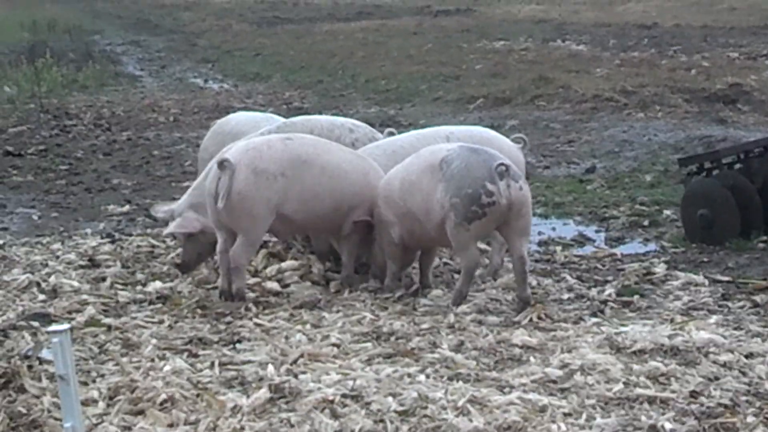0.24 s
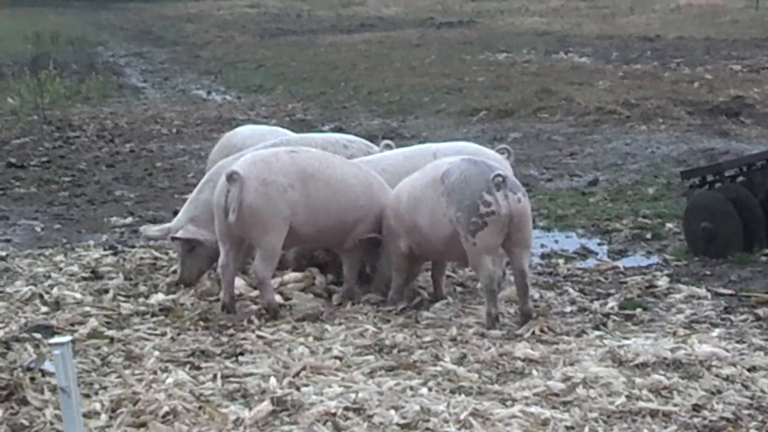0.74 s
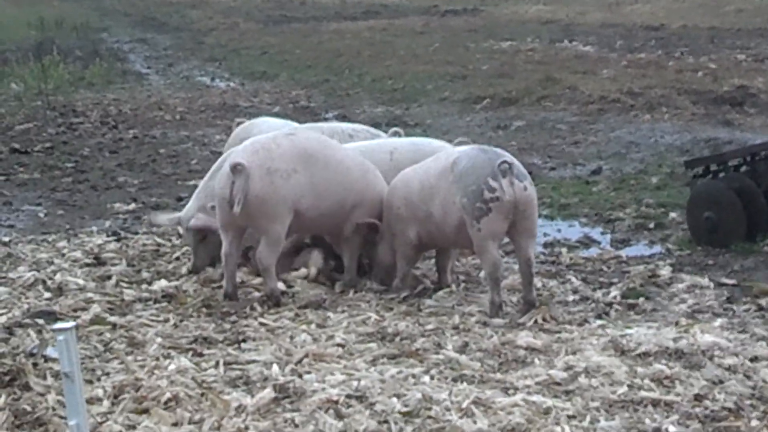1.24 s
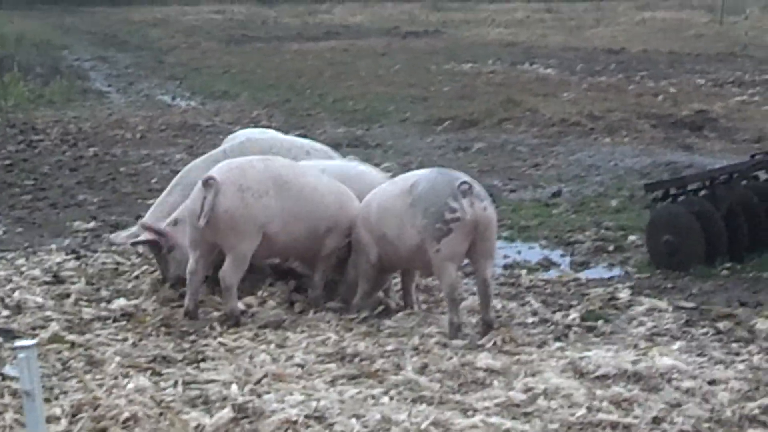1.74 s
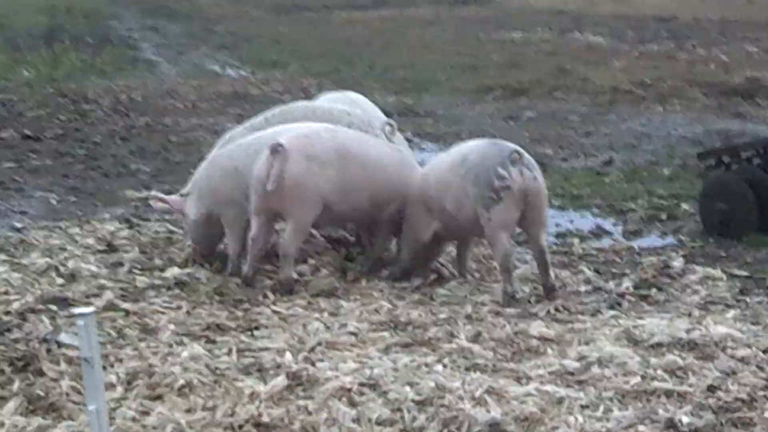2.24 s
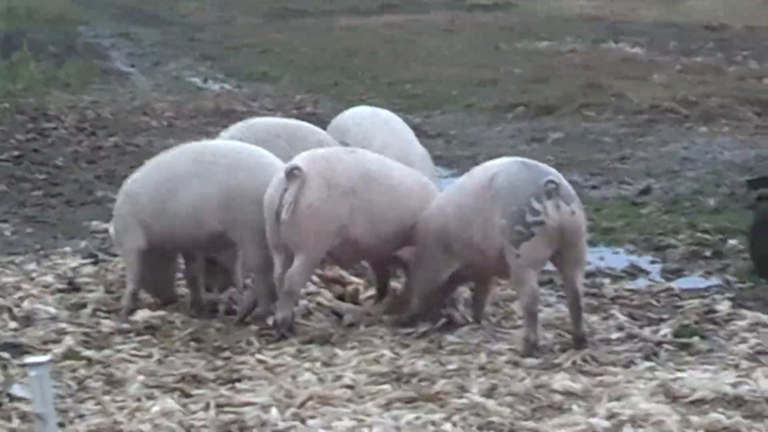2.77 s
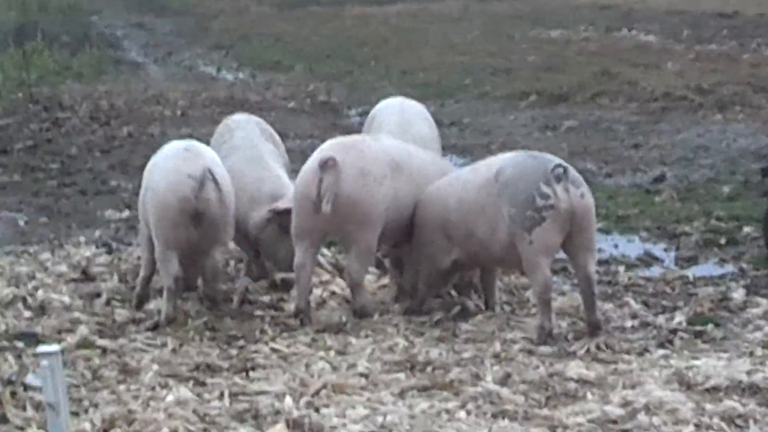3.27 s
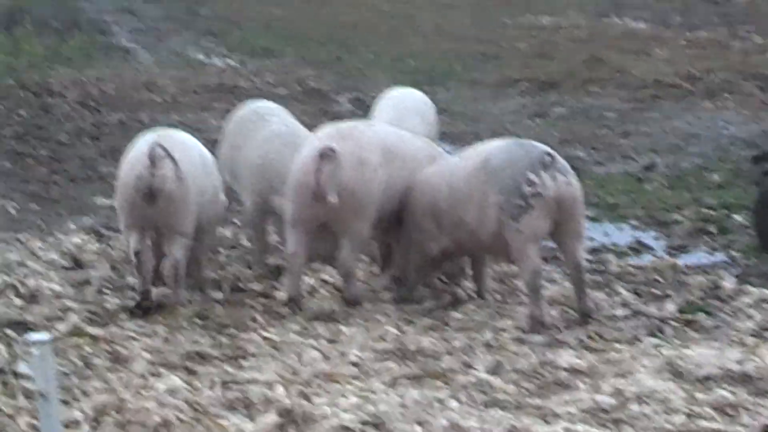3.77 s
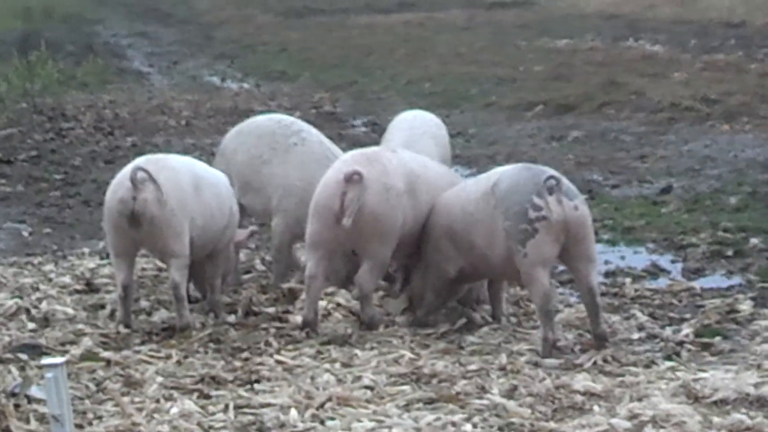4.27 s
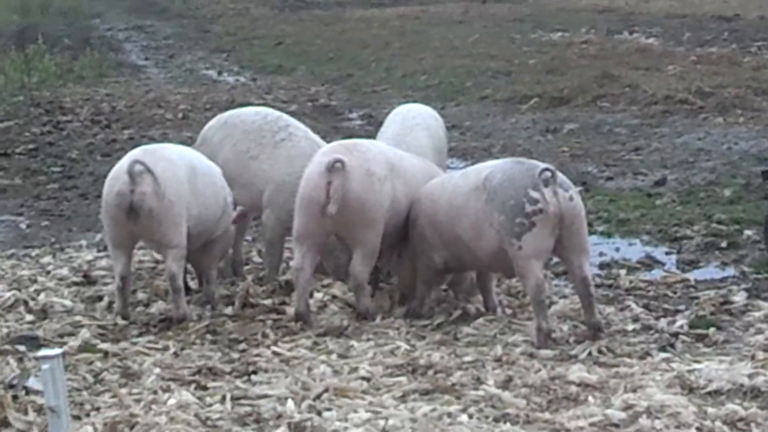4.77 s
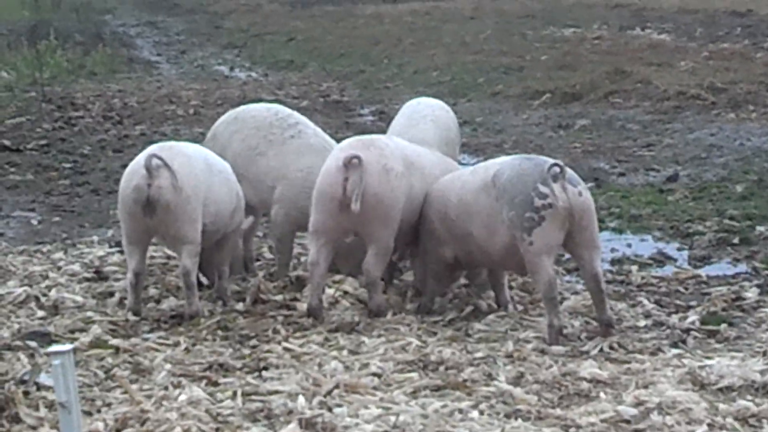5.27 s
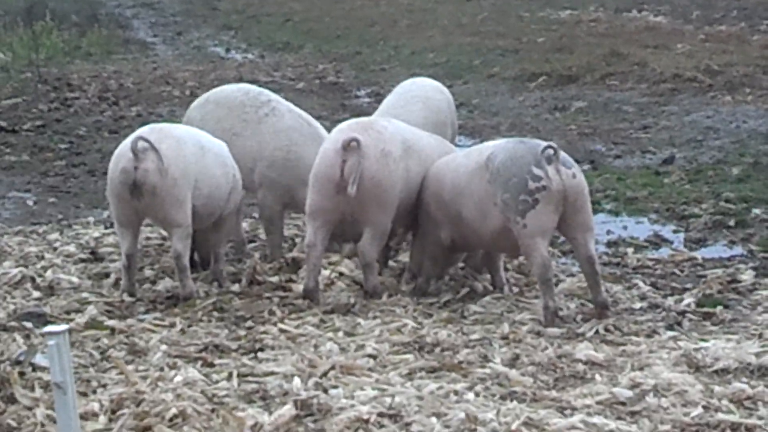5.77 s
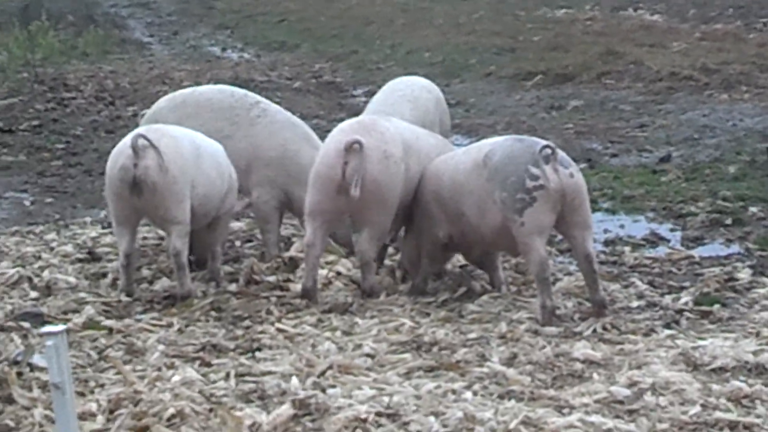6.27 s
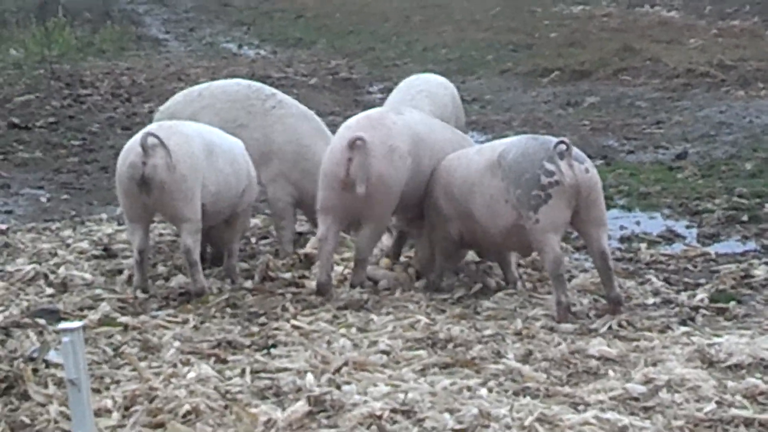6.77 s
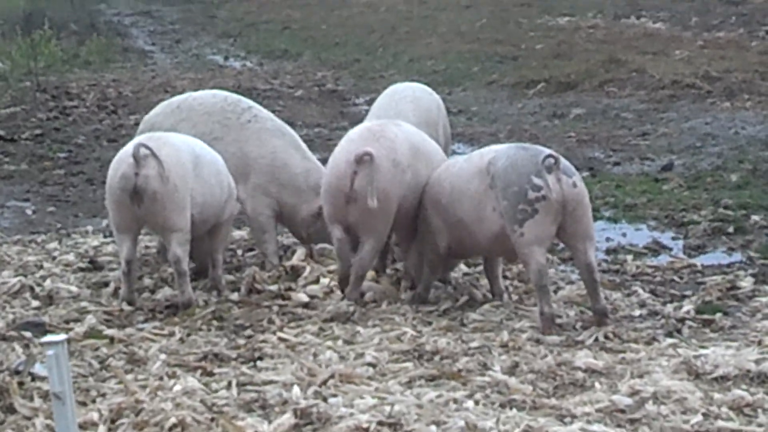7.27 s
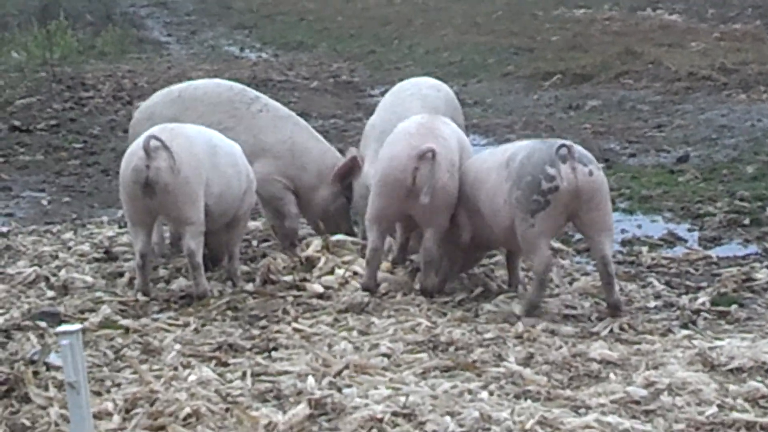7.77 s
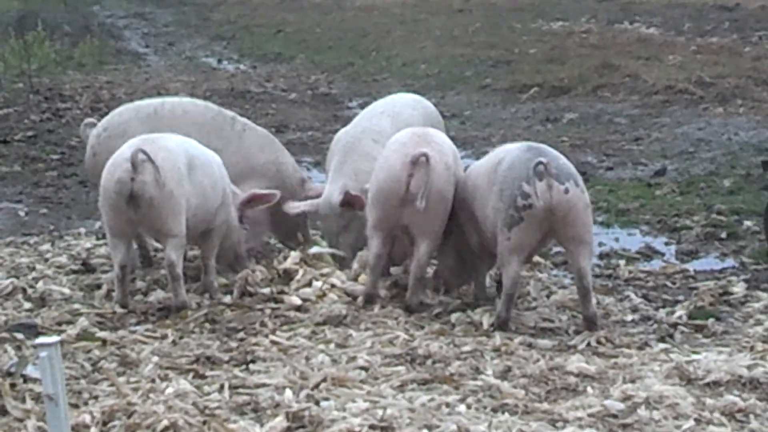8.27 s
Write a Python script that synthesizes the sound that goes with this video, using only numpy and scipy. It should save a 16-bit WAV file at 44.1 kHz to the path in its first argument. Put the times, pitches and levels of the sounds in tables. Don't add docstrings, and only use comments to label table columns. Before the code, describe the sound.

Close handheld pickup in an open field: pigs rooting in dry corn stalks. From 0 s, crackly rustling and small brittle snaps over a low distant rumble and soft hiss. At about 1.05 s a loud, hard, hollow clack and boom; the background dips, then climbs. Another sharp knock at 1.5 s, rustling until 2.2 s, with millisecond ticks on the microphone around 2.2 s and a deep duck into near quiet. Dull hollow bumps cluster at 3.1 s as the rumble slowly swells; faint bird whistles near 3.9 s. A strong boom lands at 4.6 s. From 5.3 to 6.2 s rustling is brightest, with crisp snaps and the clearest bird whistle at 5.55 s. Heavy thud at 6.1 s, then tumbling thuds and knocks from 6.8 to 7.5 s, softer bumps to 8.1 s, faint whistles and final rustles over the loud rumble, ending about 8.5 s.

```python
import sys
import numpy as np
from scipy import signal
from scipy.io import wavfile
from scipy.ndimage import uniform_filter1d

SR = 44100
rng = np.random.default_rng(int(sys.argv[2]) if len(sys.argv) > 2 else 0)


def wav_record(signal):
    frames = np.transpose(np.atleast_2d(signal))
    bounded = np.clip(frames, -1, 1)
    quanta = np.round(bounded * 32767).astype(np.int16)
    wavfile.write(sys.argv[1], SR, quanta)


def makeup_ratio(level_db):
    decades = np.asarray(level_db, float) / 20
    return 10 ** decades


N = 375732
GAIN_EDGE_S = 0.024


def rms_one(x):
    return x / np.sqrt(np.mean(x ** 2) + 1e-20)


def peak_one(x):
    return x / np.abs(x).max()


def add(track, s, sound):
    i = round(s * SR)
    track[i:i + len(sound)] += sound[:N - i]


def at_hz(points, hz):
    point_hz, level = np.transpose(points)
    return np.interp(np.log(hz), np.log(point_hz), level)


def drift(rate_hz):
    r = np.exp(-2 * np.pi * rate_hz * 40 / SR)
    noise = rng.standard_normal(N // 40 + 2002)
    slow = signal.lfilter([1], [1, -2 * r, r * r], noise)[2000:]
    return np.interp(np.arange(N) / 40, np.arange(len(slow)), rms_one(slow))


def ring(clicks, hz, t60):
    r = makeup_ratio(-60 / (t60 * SR))
    w = 2 * np.pi * hz / SR
    return signal.lfilter([0, np.sin(w)], [1, -2 * r * np.cos(w), r * r], clicks + 1e-18)


def coloured(sources, spectrum, shared_db, patchy_db):
    out = 0
    together = drift(9.0)
    edges = 25 * 2 ** np.arange(0, 9.5, 1 / 3)
    for k, (low, high) in enumerate(zip(edges, edges[1:])):
        bandpass = signal.butter(2, [low, high], "band", fs=SR, output="sos")
        band = signal.sosfilt(bandpass, sources[k % 2])
        level_db = at_hz(spectrum, np.sqrt(low * high))
        flicker_db = shared_db * together + patchy_db * drift(3.4)
        out = out + band * makeup_ratio(level_db + flicker_db)
    return rms_one(out)


def gain_control():
    # (time [s], far rumble level left [dB])
    resets = [(0.0, -40), (1.068, -48), (1.53, -45.5), (1.87, -45), (2.222, -55.5), (3.2, -47), (4.66, -43),
              (6.133, -40), (6.9, -37), (7.22, -40), (7.5, -40)]
    recover_db_per_s = 9
    t = np.arange(N) / SR
    s, db = np.transpose(resets)
    last = np.clip(np.searchsorted(s, t, "right") - 1, 0, None)
    level = db[last] + recover_db_per_s * (t - s[last])
    return uniform_filter1d(level, size=int(GAIN_EDGE_S * SR), mode="nearest")


def far_rumble():
    # (frequency [Hz], density [dB per Hz])
    rumble_spectrum = [(30, -23), (50, -8), (80, -1.5), (130, 3), (200, -3.5), (340, -7.5), (600, -17),
                       (1000, -15), (1700, -25), (3000, -31), (5200, -85), (8000, -65), (16000, -82)]
    return coloured(rng.standard_normal((2, N)), rumble_spectrum, shared_db=.25, patchy_db=.7)


def air_hiss():
    # (frequency [Hz], density [dB per Hz])
    hiss_spectrum = [(3000, 3.5), (6000, 6.5), (9000, 2.5), (12000, 1), (14500, 8.5), (15600, 1.5),
                     (20000, 1.5)]
    return coloured(rng.standard_normal((2, N)), hiss_spectrum, shared_db=0.9, patchy_db=.7)


def bird():
    # (time [s], length [s], top pitch [Hz], level [dB], top reached after [s])
    whistles = [(1.56, .19, 3280, -61, -.05), (2.0, 0.24, 3360, -57.5, .01), (2.556, .23, 3450, -65, -.08),
                (3.19, 0.25, 3350, -57, -0.021), (3.888, 0.11, 3360, -53, -.05),
                (3.98, .13, 3200, -61, 0.039), (5.545, 0.32, 3360, -42.5, .08),
                (6.417, 0.24, 3280, -50.5, 0.019), (7.74, .2, 3670, -59, -0.0028),
                (7.82, 0.1, 3600, -55, -.15), (8.05, 0.2, 3650, -55, -.03), (8.14, .14, 3530, -50, -0.085),
                (8.35, 0.062, 3820, -53, 0.0033), (8.41, .105, 2850, -52, -.03)]
    sag_hz_per_s, curl_hz_per_s2, fade_db_per_s = 330, 2020, 22
    out, waver, wobble = np.zeros(N), drift(30.0), drift(30.0)
    for s, length, hz, db, top_s in whistles:
        t = np.arange(0, length, 1 / SR)
        off = np.sqrt((t - top_s) ** 2 + .02 ** 2)
        glide = hz - sag_hz_per_s * off - curl_hz_per_s2 * off ** 2
        glide = glide + 20 * wobble[int(s * SR):][:len(t)]
        shape = makeup_ratio(db + 11.0 - fade_db_per_s * off) * signal.windows.tukey(len(t), .35)
        add(out, s, shape * np.sin(2 * np.pi * np.cumsum(glide) / SR))
    return out * makeup_ratio(3.8 * waver - 5.5)


def ticks():
    # (time [s], low ring [Hz], low ring level [dB], high ring level [dB], click level [dB])
    housing_ticks = [
        (2.1589, 3800, -16, -19.5, -35),
        (2.2186, 4830, -10, -9.5, -33),
        (2.2524, 2500, -20, -11, -29),
    ]
    high_hz = 12450
    out, click = np.zeros(N), np.zeros(SR // 50)
    click[:2] = 1, -.6
    for s, low_hz, low_db, high_db, click_db in housing_ticks:
        low = peak_one(ring(ring(click, low_hz, 0.00071), low_hz, 0.00064))
        high = peak_one(ring(ring(click, high_hz, 0.00066), high_hz, 0.00065))
        add(out, s, makeup_ratio(low_db) * low + makeup_ratio(high_db) * high + makeup_ratio(click_db) * click)
    return out


def shoving():
    # (time [s], lift of the rumble [dB], lift of the hiss [dB], fade [s])
    shoves = [(1.051, 22, 5, 0.12), (1.53, 7, 12, 0.024), (2.19, 10.5, 7, 0.052), (3.05, -2, 11, .14),
              (4.58, 5, 4.5, 0.13), (5.6, 2.5, 8.5, 0.3), (.76, 1.4, -2, 0.19), (6.42, -1.7, 5, .3),
              (5.86, 2.5, 2, 0.38), (6.8, 0.5, 1, 0.099), (7.08, 6.5, 4, 0.17), (7.95, 0, 8.5, 0.14)]
    t = np.arange(N) / SR
    lift = np.zeros((2, N))
    for s, *lifts_db, fade_s in shoves:
        lift += np.outer(lifts_db, (t >= s) * np.exp(-np.abs(t - s) / fade_s))
    return uniform_filter1d(lift, size=int(GAIN_EDGE_S * SR))


def all_knocks():
    # (time [s], thump [dB], thump pitch [Hz], clack [dB], t60 [s])
    thuds = [(0.582, -26, 148, -39, 0.11), (1.0445, -6, 480, -1.5, .035), (1.063, -25, 170, -21.5, 0.13),
             (1.109, -16, 202, -30, 0.054), (1.844, -40.5, 221, -36.5, 0.38), (4.165, -25, 168, -34, 0.071),
             (4.429, -36, 191, -37, 0.23), (4.577, -21, 150, -34.5, 0.22), (6.086, -16.5, 120, -38, 0.035),
             (6.106, -23, 238, -45, 0.039), (6.124, -6.5, 242, -42, 0.093), (6.832, -7, 138, -21.5, 0.058),
             (6.86, -15, 184, -46, 0.06), (6.887, -9.5, 121, -25, 0.082), (7.072, -14.5, 200, -35, .051),
             (7.115, -16.5, 168, -27, 0.091), (7.136, -29, 122, -26, 0.24), (7.459, -10, 218, -33, 0.075),
             (7.807, -17.5, 125, -43, .1), (7.897, -24.5, 122, -48, 0.22), (8.116, -23, 150, -36, 0.12)]
    # (time [s], thump [dB], clack [dB], t60 [s])
    booms = [(0.262, -22, -47, 0.069), (1.0498, -8.5, -10.5, 0.031), (1.074, -18, -22.5, 0.2),
             (1.553, -24, -33.5, 0.13), (3.068, -16, -35.5, .15), (3.082, -25, -34, 0.18),
             (3.104, -27, -41, 0.15), (3.122, -19, -26.5, 0.16), (3.145, -27, -42, 0.32),
             (3.229, -32, -52, 0.4), (4.618, -8, -16.5, 0.12), (4.668, -21, -53, 0.25),
             (6.877, -24, -25.5, 0.046), (7.041, -18.5, -34, 0.076), (7.15, -21, -29.5, .14),
             (7.164, -9, -33, 0.18), (7.186, -9.5, -18.5, 0.075), (7.192, -16, -20.5, 0.03),
             (1.519, -16.5, -35, 0.11), (7.46, -16, -39, 0.085), (7.469, -19.5, -44, 0.071)]
    # (time [s], thump [dB], thump pitch [Hz], clack [dB], crack pitch [Hz])
    raps = [(0.533, -48, 300, -41, 1060), (1.147, -45, 443, -25.5, 2720), (1.5173, -9, 620, -13.5, 940),
            (1.71, -30, 416, -32, 2300), (2.618, -47, 254, -42.5, 2180), (3.185, -29, 450, -24.5, 1050),
            (4.649, -16, 410, -23.5, 2560), (5.465, -29, 350, -28, 2140), (7.034, -21, 484, -26, 2500),
            (7.172, -19, 510, -31, 2400), (7.19, -19.5, 506, -33, 2400)]
    cavity_hz, thud_crack_hz, boom_crack_hz, rap_t60_s = 307, 1460, 1530, 0.066
    blows = [(s, thump, hz, clack, thud_crack_hz, t60) for s, thump, hz, clack, t60 in thuds]
    blows += [(s, thump, cavity_hz, clack, boom_crack_hz, t60) for s, thump, clack, t60 in booms]
    return blows + [(*row, rap_t60_s) for row in raps]


def knocks(grit_per_s, body_db, crunch_db):
    # (frequency [Hz], level [dB], t60 [s])
    modes = [
        (303, -27, 0.36),
        (468, -5, 0.17),
        (526, -14, 0.077),
        (782, 2, 0.061),
        (1095, -2, 0.064),
        (1360, -5, 0.0076),
        (1695, -9.5, 0.051),
        (1800, -46, 0.0044),
        (2300, -2, 0.035),
        (2500, 0, 0.018),
    ]
    out, t = np.zeros(N), np.arange(SR // 2) / SR
    muffle = signal.butter(4, 3600, fs=SR, output="sos")
    crunchy = signal.butter(1, [600, 2500], "band", fs=SR, output="sos")
    for s, thump_db, thump_hz, clack_db, crack_hz, t60 in all_knocks():
        t60 = np.clip(t60, .02, .4)
        dying = makeup_ratio(-60 * t / t60) * (1 - np.exp(-t / 0.0029))
        grit = rng.standard_normal(len(t)) * (rng.random(len(t)) < grit_per_s / SR)
        scrape = rng.standard_normal(len(t)) * dying
        blow = 0.69 * grit * dying
        blow[30] = 0.7 + makeup_ratio(clack_db + 2.5)

        soft = signal.lfilter([.05], [1, -.95], blow + 0.049 * scrape)
        thump = ring(soft, thump_hz, 0.39 * t60) + 0.92 * ring(soft, 1.554 * thump_hz, 0.16 * t60)
        thump += 0.41 * ring(soft, 407.0, 0.02)
        near = np.exp(-(np.log(thump_hz / 290) / .25) ** 2)
        thump += 0.14 * near * (ring(soft, 281., 0.25) + ring(soft, 303., 0.18))

        body = np.zeros(len(t))
        for hz, db, ring_s in modes:
            uneven_db = rng.normal(0, 0.63)
            body += makeup_ratio(db + uneven_db) * ring(blow, hz, ring_s * min(t60, .1) / 0.21)
        crunch = signal.sosfilt(crunchy, blow + 0.16 * scrape)
        clack = peak_one(ring(blow, crack_hz, 0.0025))
        clack = clack + makeup_ratio(body_db) * peak_one(body) + makeup_ratio(crunch_db) * peak_one(crunch)
        muffled = signal.sosfilt(muffle, clack)
        add(out, s, makeup_ratio(thump_db) * peak_one(thump) + makeup_ratio(clack_db) * muffled)
    return out


def snaps(cycles):
    # (time [s], peak [dB])
    stalks = [(0.016, -34), (0.027, -26), (0.04, -28), (0.251, -34), (0.381, -36), (2.72, -47), (3.02, -50),
              (3.188, -42), (3.425, -41), (3.61, -40), (3.62, -43), (3.999, -40), (4.439, -33),
              (4.454, -37), (4.491, -37), (4.625, -36), (4.7, -40), (5.312, -24), (5.469, -34),
              (5.606, -22), (5.986, -24), (6.0, -24), (6.362, -42), (6.409, -35), (6.77, -30), (7.137, -33),
              (7.447, -39), (7.768, -36)]
    # (time [s], peak [dB], pitch [Hz])
    husks = [(0.187, -38, 2500), (0.532, -42, 9000), (0.548, -34, 5850), (1.015, -27, 7600),
             (1.148, -38, 5000), (1.151, -42, 7000), (1.154, -40, 4800), (1.353, -44, 2500),
             (2.533, -48, 2500), (2.621, -48, 14480), (3.351, -47, 5170), (3.847, -42, 6020),
             (4.083, -38, 13840), (4.44, -36, 9000), (4.567, -42, 6200), (4.737, -40, 13880),
             (5.036, -37, 5980), (5.08, -41, 7130), (7.232, -32, 2500), (0.531, -34, 1070),
             (1.845, -37, 1020), (2.619, -42, 1300), (4.427, -35, 1130), (4.578, -32, 1250),
             (6.769, -26, 1100)]
    stalk_hz, pitch_spread = 3900, .05
    out, t = np.zeros(N), np.arange(SR // 40) / SR
    pitched_stalks = [(s, db, stalk_hz * np.exp(pitch_spread * rng.normal())) for s, db in stalks]
    for s, db, hz in husks + pitched_stalks:
        cracks = rng.standard_normal(len(t)) * np.exp(-t / 0.0017)
        snap = ring(cracks, hz, cycles / hz) + 0.17 * ring(cracks, min(1.44 * hz, 15000), cycles / hz)
        add(out, s, makeup_ratio(db + 3) * peak_one(signal.lfilter([1, 1], [1], snap)))
    return out


def puffs(per_s, size, fade_s):
    jumps = (rng.random(N) < per_s / SR) * rng.exponential(size, N)
    r = np.exp(-1 / (fade_s * SR))
    edge = np.exp(-1 / (0.0015 * SR))
    sinking = signal.lfilter([1], [1, -r], jumps)
    return 1 + signal.lfilter([1 - edge], [1, -edge], sinking)


def rooting():
    # (time [s], length [s], lift of the rustle [dB])
    bouts = [(0.0, 0.081, 11), (0.2, 0.11, 5), (0.547, 0.13, 3), (0.72, 0.32, 8.5), (1.384, 0.24, 5.5),
             (1.717, .47, 6.5), (2.88, 0.088, 6.5), (4.596, 0.03, 7), (5.14, .08, 0.5), (5.375, 0.22, 10.5),
             (5.602, .12, 14), (5.852, 0.33, 10), (6.172, 0.11, 6.5), (6.34, 0.17, 4.5), (6.807, 0.13, 5),
             (7.087, 0.14, 6.5), (7.38, .1, 3.5), (7.94, .1, 3.5), (8.28, .12, 5.5), (8.431, .1, 8.5)]
    t = np.arange(N) / SR
    lift = sum(db * ((t >= s) & (t < s + length)) for s, length, db in bouts)
    return uniform_filter1d(lift, size=int(.055 * SR), mode="nearest")


def rustle(crackle_per_s, spread_db, swish):
    # (frequency [Hz], density [dB per Hz])
    leaf_spectrum = [(300, 3.5), (600, -2.5), (1300, -2.5), (1800, 1), (2250, 2.5), (2900, -1),
                     (3400, -2.5), (3900, -4), (4600, -8), (5200, -6), (6800, -29.5), (9000, -20.5),
                     (15000, -32)]
    born = rng.random((2, N)) < crackle_per_s * makeup_ratio(4.0 * drift(20.0)) / SR
    sizes = makeup_ratio(spread_db * np.minimum(rng.exponential(1, (2, N)), 4))
    sizes = sizes * rng.choice([-1, 1], (2, N))
    source = rms_one(born * sizes) + swish * rng.standard_normal((2, N))
    return coloured(source, leaf_spectrum, shared_db=.7, patchy_db=.9)


def scene():
    bed_db, lift_db = gain_control(), rooting()
    boom_db, brush_db = shoving()
    rumble_db = bed_db + 0.033 * lift_db + boom_db
    rustle_db = bed_db - 13.0 + lift_db
    hiss_db = bed_db - 18.0 + 0.24 * lift_db + brush_db
    mic_floor = makeup_ratio(-74.5)

    flurry = puffs(per_s=26., size=.5, fade_s=.006)
    rumble = makeup_ratio(rumble_db + .6) * far_rumble()
    hiss = (makeup_ratio(hiss_db - 0.46) + mic_floor) * flurry * air_hiss()
    leaves = makeup_ratio(rustle_db + 3) * flurry * rustle(crackle_per_s=2500., spread_db=4.5, swish=1.0)
    blows = knocks(grit_per_s=900., body_db=3.0, crunch_db=2.5)
    field = rumble + hiss + bird() + blows + snaps(cycles=14.0) + leaves

    top_edge = signal.ellip(10, .5, 60, 15750, fs=SR, output="sos")
    tick_edge = signal.butter(10, 16200, fs=SR, output="sos")
    mono = signal.sosfilt(top_edge, field) + signal.sosfilt(tick_edge, ticks())
    return np.array([mono, mono])


def roll_off(x):
    return signal.sosfilt(signal.butter(12, 17000, fs=SR, output="sos"), x)


def record(dry):
    low_cut = signal.butter(4, 68, "high", fs=SR, output="sos")
    left = signal.sosfilt(low_cut, dry[0])
    left = .95 * np.tanh(left / .95)
    lag = 16
    late = np.concatenate([np.zeros(lag), left[:-lag]])
    wide = np.array([left, -makeup_ratio(.25) * late])
    return roll_off(wide)


dry = scene()
out = record(dry)
wav_record(out)
```